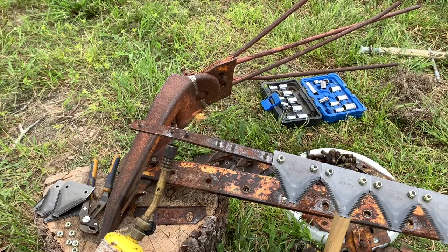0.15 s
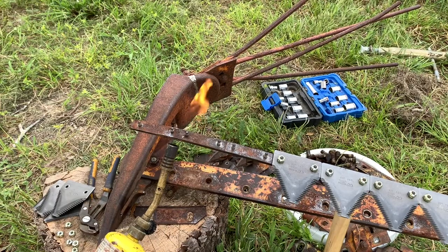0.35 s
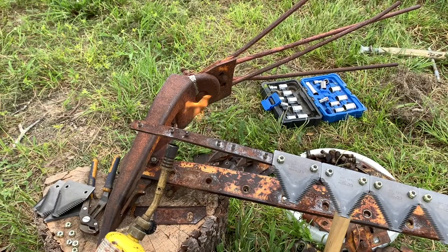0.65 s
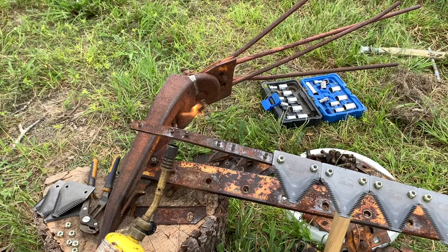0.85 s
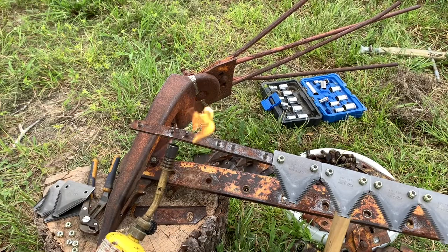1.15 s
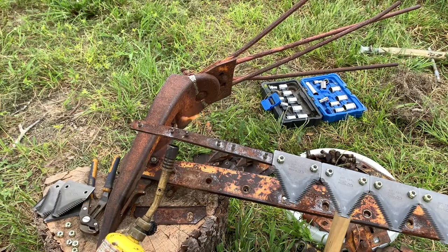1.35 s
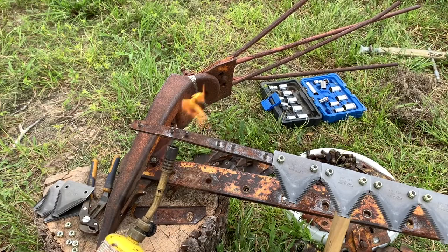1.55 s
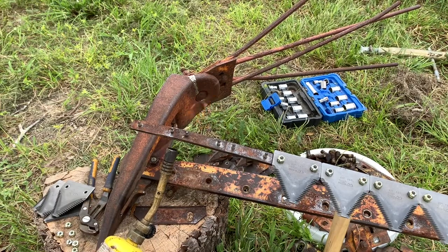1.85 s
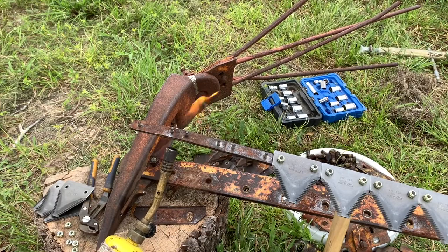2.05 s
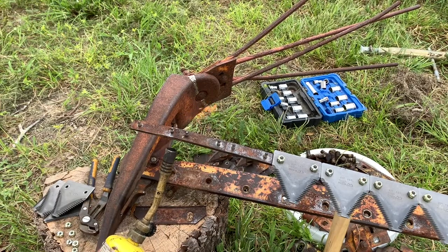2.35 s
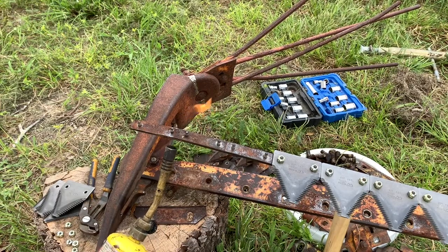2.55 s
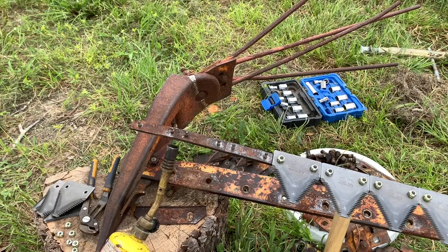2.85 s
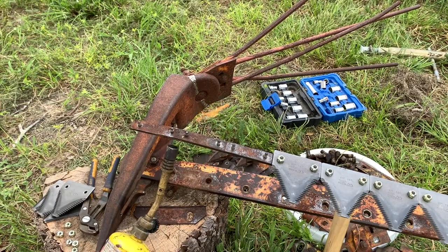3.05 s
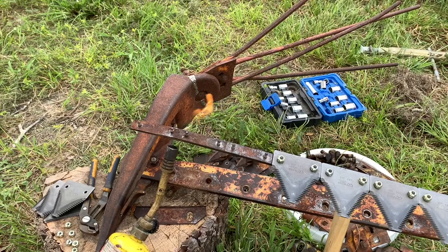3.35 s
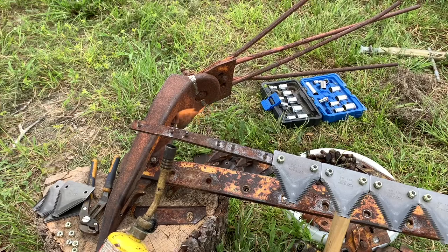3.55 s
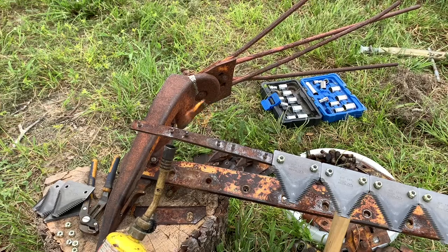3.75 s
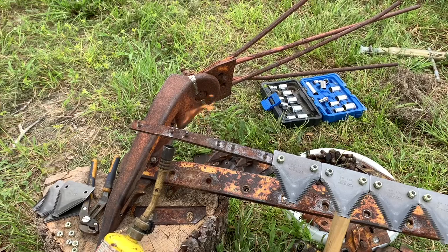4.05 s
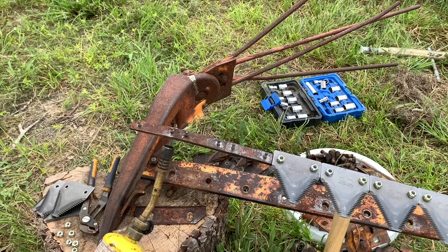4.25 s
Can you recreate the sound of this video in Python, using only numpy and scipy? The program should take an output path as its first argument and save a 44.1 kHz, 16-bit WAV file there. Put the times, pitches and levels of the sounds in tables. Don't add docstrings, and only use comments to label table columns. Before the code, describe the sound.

Close fluttering roar of a burning gas torch with uneven pops, thin bright hiss, tiny metallic ticks and low wind thumps in an open yard.

```python
import sys
import numpy as np
from scipy import signal
from scipy.fft import rfft, irfft, next_fast_len
from scipy.io import wavfile
from scipy.ndimage import uniform_filter1d

SR = 44100
rng = np.random.default_rng(int(sys.argv[2]) if len(sys.argv) > 2 else 0)


def unload_wav(signal):
    wavfile.write(
        sys.argv[1],
        SR,
        np.round(np.clip(np.atleast_2d(signal).T, -1, 1) * 32767).astype(np.int16),
    )


def magnitude_from_level(level_db):
    exponent = np.asarray(level_db, float) / 20
    return 10 ** exponent


N = 194743
T = np.arange(N) / SR


def curves(table):
    s, *columns = np.transpose(table)
    return [np.interp(T, s, column) for column in columns]


def unit(x):
    return x / np.sqrt(np.mean(x ** 2))


def swell(t, centre_s, half_s):
    return np.exp(-0.5 * ((t - centre_s) / half_s) ** 2)


def band(x, hz, width):
    return signal.lfilter(*signal.iirpeak(hz, hz / width, fs=SR), x)


def colour(x, spectrum):
    size = next_fast_len(len(x) + len(x) % 2) * 2
    hz, db = np.transpose(spectrum)
    bins_hz = np.fft.rfftfreq(size, 1 / SR) + 1e-3
    log_gain = np.interp(np.log(bins_hz), np.log(hz), db) * np.log(10) / 20
    cepstrum = irfft(log_gain)
    cepstrum[1:size // 2] *= 2
    cepstrum[size // 2 + 1:] = 0
    return irfft(rfft(x, size) * np.exp(rfft(cepstrum)))[:len(x)]


def walk(rate):
    hold = int(SR / rate)
    steps = np.repeat(rng.standard_normal(N // 50), hold)[:N]
    return unit(uniform_filter1d(uniform_filter1d(steps, hold), hold))


# t/s, change/dB, half length/s
FLAME_FALTERS = [(0.187, -1, .03), (0.564, -4.5, 0.043), (0.66, -5.5, 0.055), (1.135, -10, 0.016),
                 (1.19, -14, 0.0091), (1.25, -9, 0.011), (1.314, 4.5, .02), (1.81, -1, 0.058),
                 (2.7, -1.5, 0.029), (4.13, -0.5, 0.022), (2.228, -1.5, 0.061), (2.343, 2, 0.021),
                 (1.59, 1, 0.025), (3.24, -1.5, 0.02), (3.55, -2.5, .03), (3.865, 1.5, 0.019)]


def falters():
    return sum(db * swell(T, s, half) for s, db, half in FLAME_FALTERS)


# t/s, level/dB
FLAME_LEVEL = [(0.0, -45), (0.12, -47), (0.28, -46), (0.42, -50), (0.5, -43.5), (0.77, -47.5), (0.9, -46),
               (1.03, -43), (1.07, -50.5), (1.52, -49.5), (1.75, -44.5), (2.27, -43.5), (2.43, -43.5),
               (2.7, -44), (3.0, -43), (3.48, -44.5), (3.85, -43.5), (4.42, -43.5)]
# f/Hz, level/dB per Hz
ROAR_SPECTRUM = [(24, -17), (40, -0.5), (70, 0), (124, -2.5), (225, 0), (323, -0.5), (435, -5.5),
                 (638, -2.5), (756, -7.5), (1160, -8.5), (1630, -14), (2240, -14), (2860, -19), (3300, -20),
                 (4620, -21.5), (6500, -30), (8450, -63), (14300, -110)]


def roar():
    roar_db = curves(FLAME_LEVEL)[0] + falters()
    pops_per_s = 2500
    chance, size, bed = rng.random(N), rng.exponential(size=N), rng.standard_normal(N)
    pops = (chance < pops_per_s / SR) * magnitude_from_level(2.8 * np.minimum(size, 5))
    burn = unit(pops - pops.mean()) + 0.66 * bed
    flutter_db = 0.13 * walk(11) + 1.44 * walk(60)
    burn = unit(colour(burn * magnitude_from_level(flutter_db), ROAR_SPECTRUM))

    root = signal.lfilter(*signal.butter(2, 110, fs=SR), burn)
    low = signal.lfilter(*signal.butter(2, 1600, fs=SR), burn)
    body, edge = low - root, burn - low
    effort_db = roar_db + 46
    root_db = -10 + 0.1 * effort_db + 1.5 * walk(5.8) + 1.54 * T
    edge_db = -2 + 0.21 * effort_db
    return magnitude_from_level(roar_db + 0.3) * (magnitude_from_level(root_db) * root + body + magnitude_from_level(edge_db) * edge)


# t/s, peak level/dB
LOUD_POPS = [(0.2318, -34.5), (0.288, -37), (0.4045, -39), (0.504, -46), (0.512, -41), (0.767, -42),
             (0.9593, -39), (1.022, -54), (1.0308, -34.5), (1.152, -41), (1.168, -41.5), (1.291, -51),
             (1.3096, -40), (1.49, -34.5), (1.7549, -33), (2.068, -37), (2.2358, -40), (2.6106, -38),
             (2.7434, -36), (3.1729, -32.5), (3.178, -33), (3.3388, -54), (3.4648, -36), (3.791, -34),
             (3.9091, -42), (4.3275, -34), (4.379, -28.5)]


def loud_pops():
    rise_s, gain_db = 0.00013, 3.5
    pushes = sum(magnitude_from_level(db + gain_db) * swell(T, s, rise_s) for s, db in LOUD_POPS)
    one_pop = colour(swell(T, 4 * rise_s, rise_s), ROAR_SPECTRUM)
    return colour(pushes, ROAR_SPECTRUM) / one_pop.max()


# t/s, level/dB, aim (-1 away, 1 towards)
JET_HISS = [(0.0, -56.5, 0), (0.22, -59.5, -0.12), (0.4, -59, -0.32), (0.5, -56, 1), (0.62, -59, -0.19),
            (0.95, -59, -0.83), (1.1, -58.5, -0.44), (1.2, -63.5, -0.5), (1.35, -59, -0.32),
            (1.5, -60, 0.29), (1.8, -57.5, -.4), (2.02, -58, -0.47), (2.46, -57.5, 0.71), (3.12, -58, 0.7),
            (3.56, -58.5, 0.067), (3.78, -58, 0.98), (4.2, -59, -0.52), (4.42, -58, .4)]
# f/Hz, width/Hz, level/dB, share of the hiss swings followed, change/dB per unit of aim
TUBE_NOTES = [(4665, 273, -2.5, -0.41, -0.4), (5620, 410, -24, .6, 13), (7160, 350, 1.5, 1.9, -2.2),
              (7680, 200, -5, 0.24, 0), (8370, 820, -2.5, 1.5, -0.9), (9710, 230, -12, .15, -0.5),
              (10180, 340, -6.5, .9, 4), (11100, 2400, -13, .6, 4.5), (12940, 860, -4.5, 0.76, 0),
              (15150, 910, -14.5, .6, 3), (2300, 500, -8.5, .15, 2.5)]


def jet():
    mean_hiss_db = -58
    hiss_db, aim = curves(JET_HISS)
    swing_db = hiss_db - mean_hiss_db
    flutter_db = 0.41 * walk(18) + 0.57 * walk(70)
    gas = rng.standard_normal(N)
    out = 0
    for k, (hz, width, db, follows, aim_db) in enumerate(TUBE_NOTES):
        note = unit(band(band(gas, hz, 1.5 * width), hz, 1.5 * width))
        note_db = db + follows * swing_db + aim_db * aim + 0.74 * walk(14)
        out = out + (-1) ** k * note * magnitude_from_level(note_db)
    wash = unit(band(rng.standard_normal(N), 11400, 7000)) * magnitude_from_level(swing_db - 19)
    return (out + wash) * magnitude_from_level(mean_hiss_db - 2 + flutter_db)


# t/s, peak level/dB, main ring f/Hz, second ring f/Hz, t60/s
SCALE_TICKS = [(0.04, -44.5, 3650, 10300, 0.037), (.040, -50, 7000, 12200, .02),
               (.088, -42, 10400, 7300, 0.018), (.0885, -47, 12300, 8300, .015),
               (.160, -40, 7200, 12300, 0.014), (.1605, -51, 10500, 4200, 0.043),
               (2.5315, -38, 2000, 4000, 0.0077), (2.534, -42, 10800, 12500, .006),
               (2.538, -37, 10640, 7440, 0.01), (2.5397, -37.5, 2150, 4500, .012),
               (2.5435, -34, 2870, 10600, 0.0081), (2.548, -42, 8900, 6800, .006),
               (2.629, -49, 9800, 11200, 0.016), (3.4865, -44, 5100, 7000, .012),
               (3.492, -44, 4930, 2300, 0.013), (3.534, -42, 2400, 5500, 0.0065),
               (3.600, -43, 2200, 4300, 0.0068), (4.3135, -33.5, 2200, 4850, 0.0071),
               (4.314, -42, 7900, 9900, 0.0067)]


def ticks():
    second_ring_db, rise_s, snap_decay_s = -3.5, 0.00008, 0.00088
    t = np.arange(4096) / SR
    out = np.zeros(N + len(t))
    for s, db, main_hz, second_hz, t60 in SCALE_TICKS:
        rings = np.sin(2 * np.pi * main_hz * t)
        rings = rings + magnitude_from_level(second_ring_db) * np.sin(2 * np.pi * second_hz * t)
        body = rings * np.exp(-np.log(1000) * t / t60) * (1 - np.exp(-t / rise_s))
        snap = rng.standard_normal(len(t)) * np.exp(-t / snap_decay_s)
        snap = band(band(snap, 4800, 10000), 4800, 10000)
        out[int(s * SR):][:len(t)] += magnitude_from_level(db) * (body + 1.26 * snap)
    return out[:N]


# t/s, pressure level/dB, half length/s
GUST_PUSHES = [(0.034, -31.5, 0.032), (0.366, -35, 0.033), (0.62, -38.5, 0.027), (0.789, -27, 0.046),
               (0.942, -32, 0.034), (1.091, -24.5, 0.08), (1.276, -40.5, 0.024), (1.397, -31.5, 0.035),
               (1.59, -34, 0.025), (1.977, -31, 0.035), (2.49, -23, 0.16), (2.752, -21, 0.033),
               (3, -27.5, 0.039), (3.147, -39, 0.02), (3.263, -40, 0.03), (3.389, -30, 0.036),
               (3.516, -31, 0.026), (3.664, -25, 0.021), (3.816, -22.5, 0.041), (3.957, -28.5, 0.02),
               (4.051, -24.5, 0.026), (4.236, -26, 0.02), (4.327, -28.5, 0.024)]
# t/s, pressure level/dB, half length/s
EDDY_SUCKS = [
    (0.26, -31.5, 0.023),
    (0.572, -39, 0.017),
    (2.605, -27, 0.02),
    (1.5, -36, 0.033),
]
# f/Hz, level/dB per Hz
EDDY_SPECTRUM = [(2, -22), (8, 3), (16, -11), (30, -21.5), (50, -34), (120, -59)]


def wind():
    press = sum(magnitude_from_level(db) * swell(T, s, half) for s, db, half in GUST_PUSHES)
    press = press - sum(magnitude_from_level(db) * swell(T, s, half) for s, db, half in EDDY_SUCKS)
    vent_s = 0.45
    vented = press - uniform_filter1d(press, int(vent_s * SR))
    eddies = colour(rng.standard_normal(2 * N), EDDY_SPECTRUM)[N:]
    return vented + unit(eddies) * magnitude_from_level(-48)


def yard():
    far = rng.standard_normal(N)
    for _ in range(3):
        far = band(far, 155, 223)
    return unit(far) * magnitude_from_level(-56.5 + 2.6 * walk(3.8))


def scene():
    fire = roar() + loud_pops()
    echo_s, echo_db = 0.00086, -18.5
    echo = magnitude_from_level(echo_db) * np.roll(fire, int(echo_s * SR))
    return (fire + echo + jet() + ticks() + wind() + yard())[None]


def band_limit(x):
    return signal.sosfilt(signal.butter(12, 15710, fs=SR, output="sos"), x)


def record(dry):
    top_cut = signal.ellip(8, 0.2, 60, 15900, fs=SR, output="sos")
    mix = signal.sosfilt(top_cut, dry)
    return band_limit(mix)


dry = scene()
out = record(dry)
unload_wav(out)
```